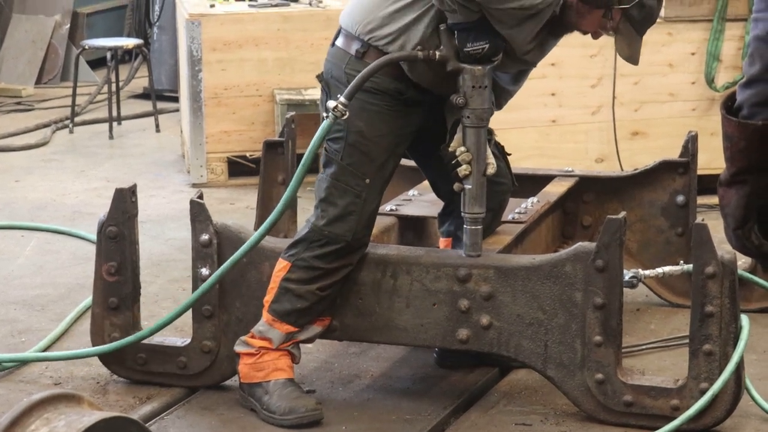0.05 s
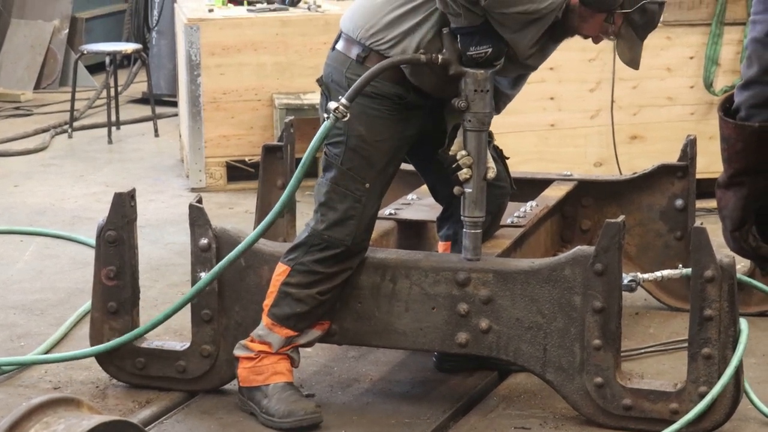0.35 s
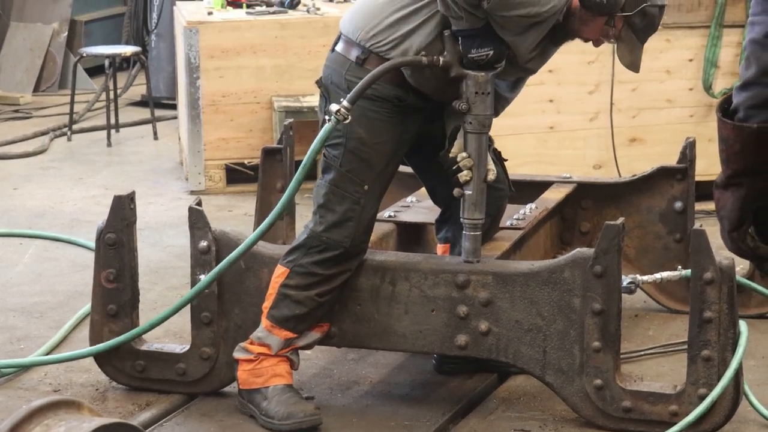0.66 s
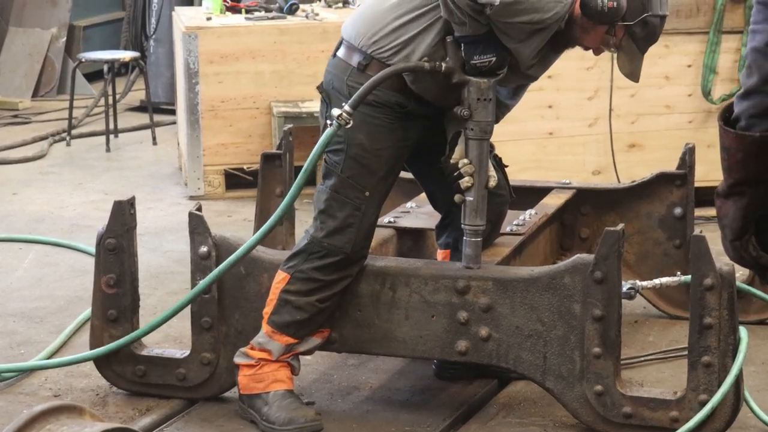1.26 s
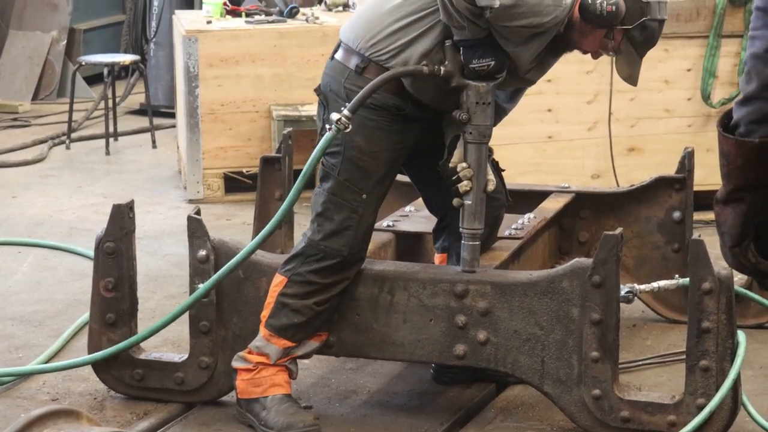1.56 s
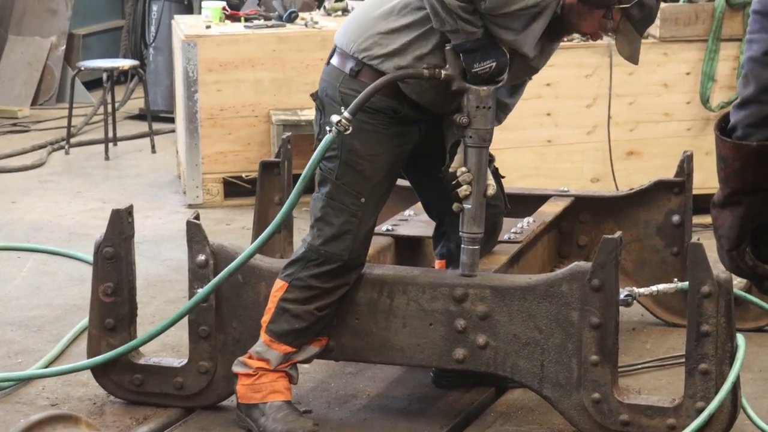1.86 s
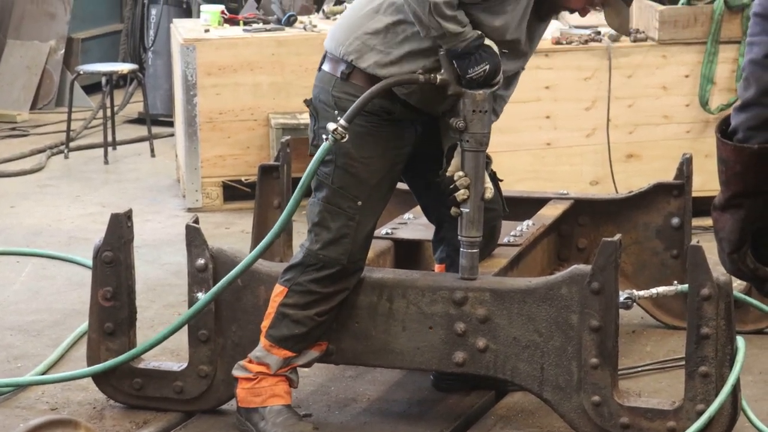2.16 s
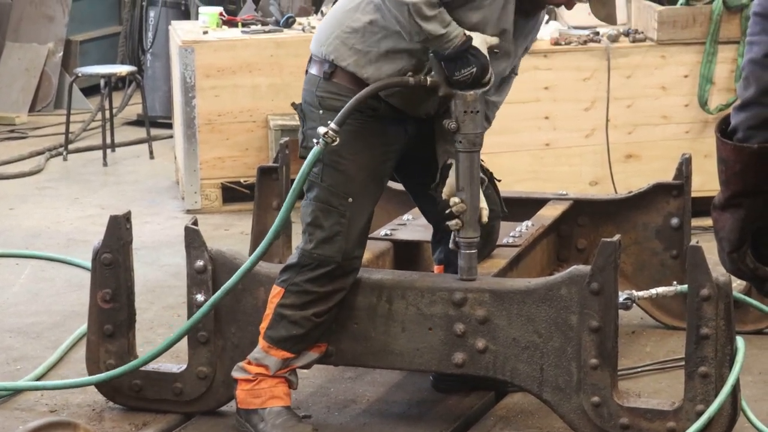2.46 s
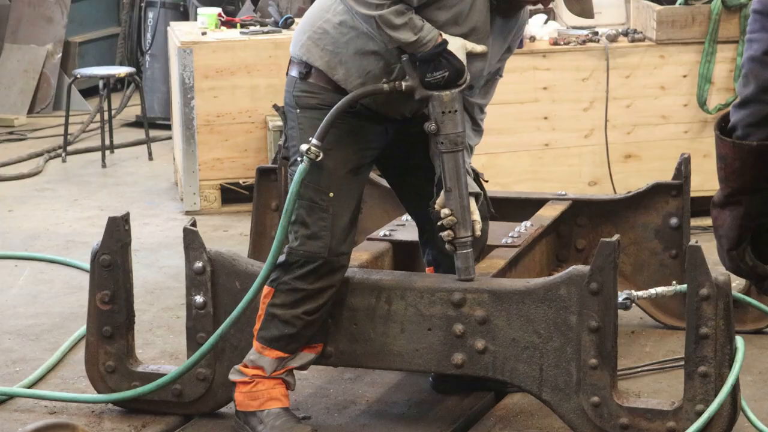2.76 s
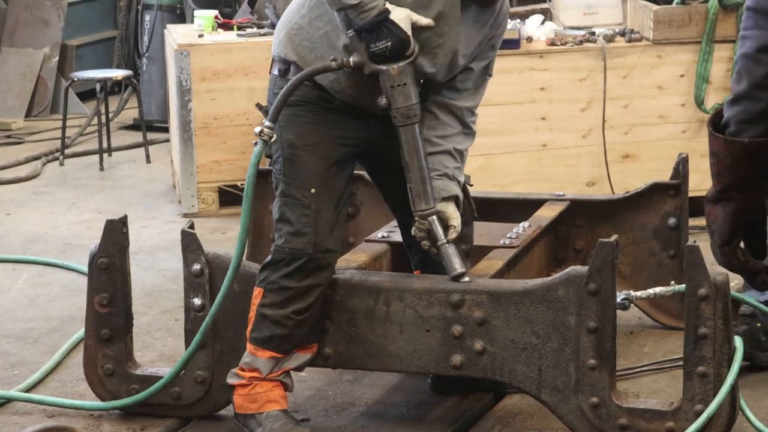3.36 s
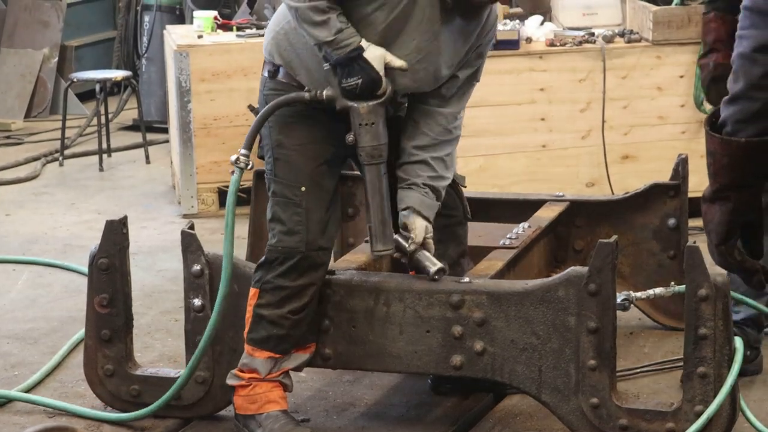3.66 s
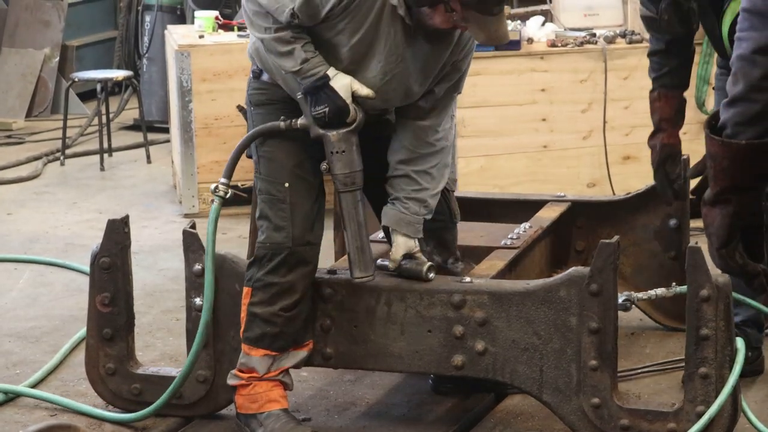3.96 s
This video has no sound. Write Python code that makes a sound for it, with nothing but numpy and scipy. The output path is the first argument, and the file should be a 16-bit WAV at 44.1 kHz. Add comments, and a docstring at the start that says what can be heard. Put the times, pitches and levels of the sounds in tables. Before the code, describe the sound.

A pneumatic riveting hammer pounds a steel frame from the start, about nineteen loud, cracking blows a second, ringing through a large workshop with a low hum and a few dull knocks beneath. At about 2 seconds it slows slightly and stops, and the ringing dies away. From then until 4 seconds, a machine drone, probably a compressor, swells up with a thin whine and steady air hiss.

```python
"""An air-powered riveting hammer pounds a steel frame about 19 times a second in a large workshop.
Each blow cracks, rings the frame and fills the hall, with a low hum and a few dull knocks beneath.
After about two seconds the hammer slows and stops. Its din holds an automatic volume control down;
as the volume creeps back, the drone of a piston machine (probably the compressor), a thin whine
and a steady hiss of air swell up."""
import sys
import numpy as np
from scipy import signal
from scipy.fft import rfft, irfft
from scipy.io import wavfile
from scipy.ndimage import uniform_filter1d

SR = 44100
rng = np.random.default_rng(int(sys.argv[2]) if len(sys.argv) > 2 else 0)


def master_out(mix):
    """Clip the mix to full scale and print it as 16-bit PCM to the path in sys.argv[1]."""
    frames = np.transpose(np.atleast_2d(mix))
    ceiling = np.clip(frames, -1, 1)
    pcm = np.round(ceiling * 32767).astype(np.int16)
    wavfile.write(sys.argv[1], SR, pcm)


N = 176400  # four seconds
LEAD_S = 1.5  # the hammer is already running this long before we start listening


def undb(db):
    """Turn decibels (dB) into a number to multiply by."""
    return 10 ** (np.asarray(db) / 20)


def level(x, db):
    """Scale a sound to an average (rms) level."""
    return x * undb(db) / np.sqrt(np.mean(x ** 2))


def on_log_axis(hz, points):
    """Read between (Hz, value) points, giving every octave equal room."""
    pitches, values = np.array(points).T
    return np.interp(np.log(np.maximum(hz, 1)), np.log(pitches), values)


def colour(x, points):
    """Make each pitch range louder or softer, following (Hz, dB) points."""
    size = 4096
    cepstrum = irfft(np.log(undb(on_log_axis(np.fft.rfftfreq(size, 1 / SR), points))))
    # Fold the second half onto the first, so the filter never rings before it is struck.
    cepstrum[1:size // 2] *= 2
    cepstrum[size // 2 + 1:] = 0
    return ring(x, irfft(np.exp(rfft(cepstrum))))


def ring(x, response):
    """Play a sound through a room or filter, given its response to one click."""
    return signal.fftconvolve(x, response)[:len(x)]


def stereo(mid, side):
    """Make left and right: mid is what they share, side makes the sound wide."""
    return np.array([mid + side, mid - side])


def wander(rate):
    """A curve of size about 1 that glides to a new random value `rate` times a second."""
    step = int(SR / rate)
    stairs = np.repeat(rng.standard_normal(N // step + 1), step)
    return level(uniform_filter1d(stairs, step)[:N], 0)


def swell(points):
    """A volume curve through (seconds, dB) points."""
    return undb(np.interp(np.arange(N) / SR, *np.array(points).T))


# The piston's blows, slowing as the trigger is let go. Each entry: start in seconds.
BLOW_TIMES = [0.0062, 0.0586, 0.1103, 0.162, 0.2132, 0.2658, 0.3176, 0.3692, 0.4204, 0.4717, 0.5233, 0.5748,
              0.6269, 0.6789, 0.73, 0.7816, 0.8332, 0.8851, 0.9367, 0.9893, 1.0406, 1.0924, 1.1438, 1.1954,
              1.2464, 1.2975, 1.3495, 1.3999, 1.4523, 1.5031, 1.5549, 1.6068, 1.6578, 1.7082, 1.7601,
              1.8118, 1.8648, 1.9243]

def hammer_blows():
    """List each blow's time and strength, ending with one weak tap as the air runs out."""
    gap_s, scatter_db = .0518, .5
    earlier = BLOW_TIMES[0] - np.arange(gap_s, LEAD_S, gap_s)
    times = np.r_[earlier, BLOW_TIMES]
    strengths = undb(scatter_db * rng.standard_normal(len(times)))
    last_tap = (2.028, undb(-20))
    return list(zip(times, strengths)) + [last_tap]


def piston_hits(blows):
    """One clean click each time the piston hits the die, the tool tip that sits on the rivet."""
    times, strengths = np.array(blows).T
    force = np.zeros(N + int(LEAD_S * SR))
    force[((times + LEAD_S) * SR).astype(int)] = strengths
    return force


def bursts(blows, shape):
    """A fresh puff of noise at every blow, rising and fading as `shape` does."""
    out = np.zeros(N + int(LEAD_S * SR))
    for at, strength in blows:
        burst = shape * rng.standard_normal(len(shape))
        start = int((at + LEAD_S) * SR)
        out[start:start + len(shape)] += strength * burst / np.linalg.norm(burst)
    return out


def die_chatter(blows):
    """The die rattles briefly on the rivet, differently at every blow."""
    roughness, fade_s = 0.29, 0.0013
    return roughness * bursts(blows, np.exp(-np.arange(SR // 100) / SR / fade_s))


def while_hammering(x, db):
    """Drop the lead-in and set the average level for the time the hammer runs."""
    x = x[..., -N:]
    running = x[..., :int(BLOW_TIMES[-1] * SR)]
    return x * undb(db) / np.sqrt(np.mean(running ** 2))


# The tone of the crack. Each row: pitch in Hz, relative level in dB.
CRACK_COLOUR = [(600, -22), (2000, -16), (3200, -13), (4000, -13), (4700, -22), (7000, -22), (7580, -12),
                (8150, -21), (8650, -10), (9200, -21), (9900, -23), (10600, -14), (11900, -20),
                (13300, -19), (15500, -21)]
# Echoes from nearby surfaces. Each row: delay in seconds, level in dB compared with the crack.
NEAR_ECHOES = [(.0078, -13), (.0185, -12), (.028, -19)]

def crack(blows):
    """A short, bright snap straight from die and rivet, then its first echoes."""
    rise_s, hold_s, fade_s, echo_fade_s = 0.00014, 0.0023, 0.0038, 0.0034
    t = np.arange(SR // 20) / SR
    shape = (1 - np.exp(-t / rise_s)) * np.exp(-np.maximum(t - hold_s, 0) / fade_s)
    for delay, db in NEAR_ECHOES:
        echo = undb(db) * (t > delay) * np.exp(-np.abs(t - delay) / echo_fade_s)
        shape = np.hypot(shape, echo)
    mid, side = (colour(bursts(blows, shape), CRACK_COLOUR) for _ in range(2))
    return while_hammering(stereo(mid, undb(-15) * side), db=0.5)


# The steel frame's strongest notes. Each row: pitch in Hz, relative level in dB.
FRAME_NOTES = [(231, -49), (272, -50), (388, -47), (427, -46), (618, -44), (873, -40.5), (1014, -38.5),
               (1275, -44.5), (1453, -41), (1583, -41), (1803, -39), (2024, -36.5), (2054, -39),
               (2076, -41), (2175, -42), (2347, -38), (2417, -39), (2600, -40), (2719, -39), (3079, -43.5),
               (3230, -42), (3397, -43.5), (3671, -39), (3860, -40), (4021, -43), (4393, -43), (4549, -43)]

def frame_ring(force):
    """Each blow tops up the frame's notes; the die slips a little, so their waves jump each time."""
    ring_s = .5  # time to fade by 60 dB
    slip_radians, waver_db, side_db = 1.6, 2, -23
    t = np.arange(N) / SR
    energy_kept = np.exp(-2 * np.log(1000) / ring_s / SR)  # from one sample to the next
    loudness = np.sqrt(signal.lfilter([1], [1, -energy_kept], force ** 2))[-N:]
    blows_so_far = np.cumsum(force > 0)[-N:]
    out = 0
    for hz, db in FRAME_NOTES:
        slips = slip_radians * rng.standard_normal(blows_so_far[-1] + 1)
        phase = 2 * np.pi * hz * t + np.cumsum(slips)[blows_so_far]
        side = undb(side_db) * np.sin(phase + 2 * np.pi * rng.random())
        out = out + undb(db + waver_db * wander(rate=12.2)) * stereo(np.sin(phase), side)
    return while_hammering(out * loudness, db=4.5)


# How long frame and hall ring on. Each row: pitch in Hz, seconds to fade by 60 dB.
RING_TIMES = [(60, 0.36), (300, 1.4), (1000, 1.23), (2000, 1.056), (4000, 0.9), (6000, 0.72), (9000, 0.57),
              (16000, 0.083)]

def hall():
    """The hall's answer to one click: a wash of noise that builds fast and loses its highs first."""
    fill_s = .012
    t = np.arange(2 * SR) / SR
    spectrum = rfft(rng.standard_normal(len(t)))
    hz = np.fft.rfftfreq(len(t), 1 / SR)
    out = 0
    for centre, ring_s in RING_TIMES:
        share = on_log_axis(hz, [(pitch, float(pitch == centre)) for pitch, _ in RING_TIMES])
        band = irfft(spectrum * share)
        out = out + band * np.exp(-np.log(1000) * t / ring_s) / np.sqrt(ring_s)
    return out * (1 - np.exp(-t / fill_s))


# The tone of the dense ringing. Each row: pitch in Hz, relative level in dB.
DIN_COLOUR = [(20, -41), (40, -32), (80, -22), (120, -13.5), (175, -16), (260, -8), (420, -10), (520, -9.5),
              (780, -8.5), (890, -3.5), (1030, -3.5), (1150, -5.5), (1650, -4), (2050, 1), (2500, -3.5),
              (2850, -5), (3300, -4.5), (3900, -4), (4200, -6.5), (4500, -4.5), (5250, -12), (6300, -11.5),
              (7100, -14.5), (8700, -19), (9600, -23), (11000, -19), (15500, -15)]
# How wide it sounds. Each row: pitch in Hz, side level in dB compared with the mid.
DIN_WIDTH = [(100, -72), (380, -22.5), (700, -21), (1300, -15.5), (2400, -9), (4400, -8.5), (8000, -1.5),
             (15000, 0.5)]

def din(force):
    """The frame's countless other notes blur together and spread through the hall."""
    steel = colour(force, DIN_COLOUR)
    mid = ring(steel, hall())
    side = colour(ring(steel, hall()), DIN_WIDTH)
    return while_hammering(stereo(mid, side), db=9.5)


# How the low hum rises and falls. Each row: time in seconds, level in dB.
HUM_LEVELS = [(0, -20), (.3, -14.5), (1.05, -12.5), (1.4, -22), (1.7, -32), (1.9, -17.5), (2.3, -40)]

def beam_hum(hz=173.5):
    """A steel beam's lowest note, which sings thinly while the blows keep step with it."""
    return level(np.sin(2 * np.pi * hz * np.arange(N) / SR), 0) * swell(HUM_LEVELS)


# Three dull knocks. Each row: start in seconds, level in dB.
KNOCKS = [(.059, -22), (.523, -17), (1.19, -22)]
# Their deep tone. Each row: pitch in Hz, relative level in dB.
KNOCK_COLOUR = [(25, -14), (45, -5), (130, 0), (250, -5), (900, -28), (4000, -60)]

def knocks(fade_s=0.013):
    """Dull knocks, probably the heavy frame shifting on the floor."""
    t = np.arange(SR // 10) / SR
    out = np.zeros(N)
    for at, db in KNOCKS:
        puff = rng.standard_normal(len(t)) * np.exp(-t / fade_s)
        start = int(at * SR)
        out[start:start + len(t)] += level(colour(puff, KNOCK_COLOUR), db)
    return out


CYCLE_HZ = 21.255  # the piston machine's cycles per second

def overtone(multiple, db, waver_db=3):
    """One wavering tone at a multiple of the cycle rate; the hall scrambles where its wave starts."""
    loudness = undb(db + waver_db * wander(rate=6))
    return loudness * np.sin(2 * np.pi * (multiple * CYCLE_HZ * np.arange(N) / SR + rng.random()))


# The machine's strongest tones. Each row: rough pitch in Hz, relative level in dB.
STRONG_TONES = [(193.8, -35.5), (209.9, -35), (276.3, -40), (403.8, -39), (253.0, -40), (317.6, -41),
                (425.3, -38), (468.3, -42), (532.9, -46), (726.7, -49), (1017, -48), (1042, -50),
                (1147, -52), (1211, -50)]
# The tone of its rumble and weaker overtones. Each row: pitch in Hz, relative level in dB.
MACHINE_COLOUR = [(25, -2), (42, -62), (65, -11.5), (95, -11.5), (128, -4), (155, -8.5), (200, 2),
                  (300, -2), (450, 1), (530, -11), (800, -12), (1050, -16), (1500, -16.5), (2500, -23.5),
                  (6000, -48)]
# How wide the rumble sounds. Each row: pitch in Hz, side level in dB compared with the mid.
RUMBLE_WIDTH = [(100, -54), (200, -38), (380, -21.5), (700, -11), (1300, -11), (4000, -7)]
# The drone's small surges near the end. Each row: time in seconds, level change in dB.
DRONE_SURGES = [(2.6, -1), (2.8, 0.5), (3.3, 0), (3.58, -1), (3.68, 1.5), (3.85, -0.5), (4, 1)]

def piston_machine():
    """Pistons drone in a stack of overtones, over a churning rumble and the motor's electric hum."""
    mains_hz = 120
    strong = {round(hz / CYCLE_HZ): db for hz, db in STRONG_TONES}
    tones = sum(overtone(k, db) for k, db in strong.items())
    buzz = sum(overtone(k, on_log_axis(k * CYCLE_HZ, MACHINE_COLOUR))
               for k in range(2, 64) if k not in strong)
    motor_hum = np.sin(2 * np.pi * mains_hz * np.arange(N) / SR)
    mid, side = (colour(rng.standard_normal(N), MACHINE_COLOUR) for _ in range(2))
    rumble = stereo(mid, colour(side, RUMBLE_WIDTH))
    drone = level(rumble, -21) + level(buzz, -23) + level(tones, -21.5) + level(motor_hum, -37.5)
    return drone * swell(DRONE_SURGES)


# How the whine falls and rises. Each row: time in seconds, level in dB.
WHINE_LEVELS = [(2.3, -25), (2.9, -35), (3.25, -37), (3.5, -31), (3.7, -35), (4, -32.5)]

def whine(hz=980, flutter_hz=14):
    """A thin, unsteady whine over the machine."""
    t = np.arange(N) / SR
    flutter = wander(flutter_hz) + 1j * wander(flutter_hz)  # shakes both loudness and pitch
    tone = (flutter * np.exp(2j * np.pi * hz * t)).real
    return level(tone, 0) * swell(WHINE_LEVELS)


# The tone of the hiss. Each row: pitch in Hz, relative level in dB.
HISS_COLOUR = [(600, -7.5), (1800, -2), (2200, 3.5), (2700, -1.5), (3350, 0.5), (3650, -1.5), (5000, -1.5),
               (6200, -1.5), (6800, .5), (7300, -2), (7800, 1.5), (8500, -3.5), (10000, -4.5),
               (10800, -4.5), (15500, -9)]
# How wide it sounds. Each row: pitch in Hz, side level in dB compared with the mid.
HISS_WIDTH = [(1000, -24), (2400, -10), (4400, -6), (8000, -2), (15000, 0.5)]

def air_hiss():
    """Escaping air makes a smooth, wide hiss."""
    mid, side = (colour(rng.standard_normal(N), HISS_COLOUR) for _ in range(2))
    return level(stereo(mid, colour(side, HISS_WIDTH)), db=-23.5)


def scene():
    """Add the hammering to the workshop sounds that run the whole time."""
    blows = hammer_blows()
    force = piston_hits(blows)
    rough_force = force + die_chatter(blows)
    hammering = crack(blows) + frame_ring(force) + din(rough_force) + beam_hum() + knocks()
    return hammering + piston_machine() + whine() + air_hiss()


def record(dry):
    """Cut the deep bass, turn loud sound down at once and back up slowly, round peaks, cut the top."""
    low_cut_hz, top_hz, ceiling = 38, 15850, 0.92
    target_db, recovery_db_per_s, averaging_s = -16, 13.5, 0.012
    x = signal.sosfilt(signal.butter(4, low_cut_hz, "high", fs=SR, output="sos"), dry)
    power = uniform_filter1d(np.mean(x ** 2, axis=0), int(averaging_s * SR))
    recovery = undb(recovery_db_per_s * np.arange(N) / SR)
    # Remember the loudest moment so far, and let that memory fade.
    held = np.maximum.accumulate(np.sqrt(np.abs(power)) * recovery) / recovery
    turned_down = x / np.hypot(1, held / undb(target_db))
    rounded = ceiling * np.tanh(turned_down / ceiling)
    return signal.sosfilt(signal.ellip(14, .2, 80, top_hz, fs=SR, output="sos"), rounded)


dry = scene()
out = record(dry)
master_out(out)
```